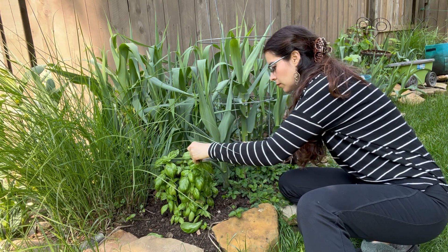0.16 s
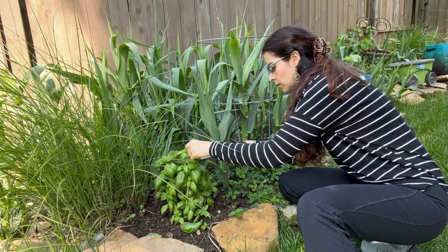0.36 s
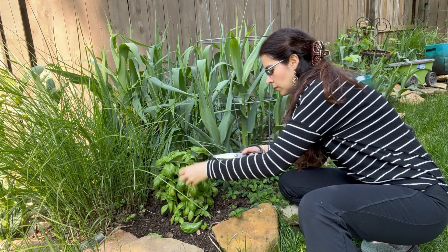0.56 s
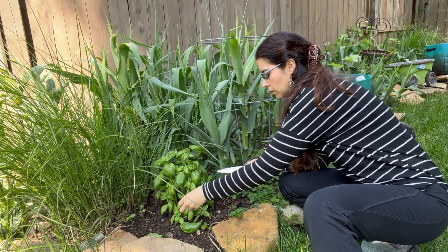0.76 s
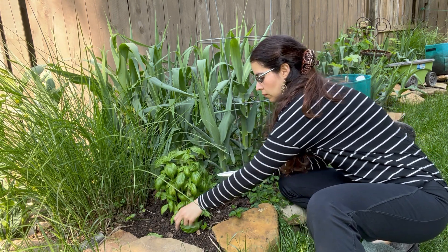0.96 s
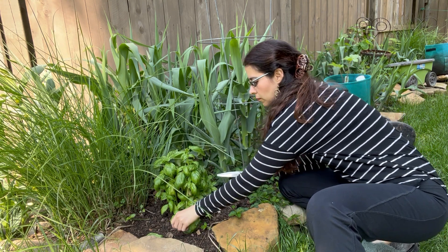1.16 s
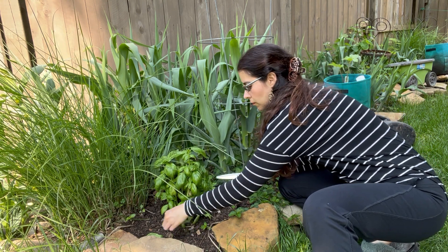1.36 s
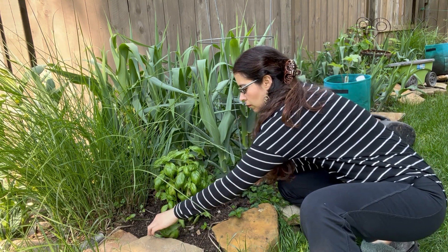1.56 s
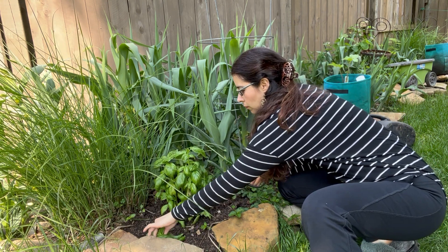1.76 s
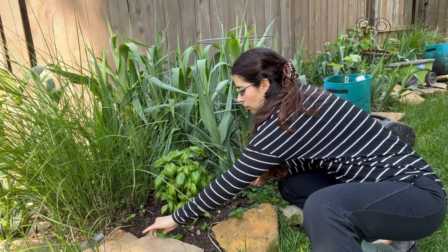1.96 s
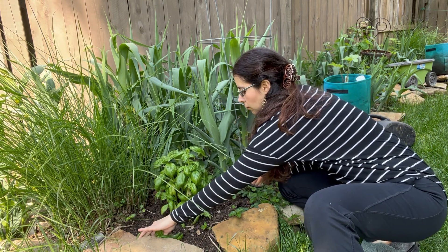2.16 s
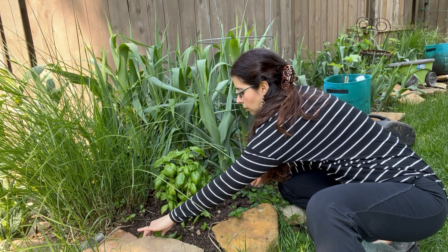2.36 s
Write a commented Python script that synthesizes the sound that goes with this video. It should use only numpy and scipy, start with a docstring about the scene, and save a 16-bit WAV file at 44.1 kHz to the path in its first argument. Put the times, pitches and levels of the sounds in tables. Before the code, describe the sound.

Clear descending bird whistles echo outdoors, with a stem snip, leafy ticks and gritty soil scrapes

```python
"""A songbird's falling whistles echo between garden fences, over a distant engine hum and soft outdoor air.
A second bird chips twice; close by, leaves rustle, a herb stem is snipped and a hand scrapes over the soil.
The birds are swept sines, single and in partials, with scattered echoes; the engine is low sines over filtered noise.
The stem, twigs and clods are decaying noise bursts, the snip adding impulses; leaves and soil are dense random grains.
"""
import sys
import numpy as np
from scipy import signal
from scipy.fft import rfft, irfft
from scipy.io import wavfile
from scipy.ndimage import uniform_filter1d

SR = 44100
rng = np.random.default_rng(int(sys.argv[2]) if len(sys.argv) > 2 else 0)


def store_pcm(level_fs):
    """Save levels as 16-bit WAV."""
    pcm = np.round(np.clip(level_fs, -1, 1) * 32767).astype(np.int16)
    wavfile.write(sys.argv[1], SR, np.atleast_2d(pcm).T)


N = 110250


def undb(db):
    """Decibel law: twenty dB is a factor of ten in amplitude."""
    return 10 ** (np.asarray(db) / 20)


def unit(x):
    """Normalisation: scale to an rms of 1."""
    return x / np.sqrt(np.mean(x ** 2))


def walk(rate):
    """Low-passed randomness: `rate` random values a second, smoothed into a drift with a spread of 1."""
    hold = max(2, int(SR / rate))
    steps = np.repeat(rng.standard_normal(N // hold + 1), hold)
    smooth = uniform_filter1d(uniform_filter1d(steps, hold), hold)
    return unit(smooth[:N])


def colour(x, points):
    """Minimum-phase filtering: a causal response through (Hz, dB) points keeps the power of white noise."""
    hz, db = np.array(points).T
    bins_hz = np.maximum(np.fft.rfftfreq(2 * N, 1 / SR), 1)
    gain = unit(undb(np.interp(np.log(bins_hz), np.log(hz), db)))
    # folding the cepstrum onto positive times makes the filter causal
    cepstrum = irfft(np.log(gain))
    cepstrum[1:N] *= 2
    cepstrum[N + 1:] = 0
    return irfft(rfft(x, 2 * N) * np.exp(rfft(cepstrum)))[..., :N]


def delay(x, seconds):
    """Linear phase shift: delays by any fraction of a sample."""
    turn = np.exp(-2j * np.pi * np.fft.rfftfreq(2 * N, 1 / SR) * seconds)
    return irfft(rfft(x, 2 * N) * turn)[:N]


def ports(x, lag_ms):
    """Arrival-time difference: the right microphone lags the left, or leads it for a negative lag."""
    lag = lag_ms / 1000
    return np.array([delay(x, -lag / 2), delay(x, lag / 2)])


def scatter(x, t60):
    """Diffuse reflection: plants and fences return decaying noise-like echoes, independent in each ear."""
    t = np.arange(N) / SR
    decay = np.exp(-np.log(1000) * t / t60)  # 60 dB down after t60 seconds
    tail = unit(rng.standard_normal((2, N)) * decay) / np.sqrt(N)
    return signal.fftconvolve(x[None], tail, axes=1)[:, :N]


LEAF_SWAY_PER_S = 130


def swaying(x, t60):
    """Modulated scattering: echoes off moving leaves flutter, smearing a pure tone into a narrow band."""
    out = 0
    for _ in range(4):
        flutter = np.array([walk(LEAF_SWAY_PER_S), walk(LEAF_SWAY_PER_S)])
        out = out + scatter(x, t60) * flutter
    return out / 2  # four independent paths, power kept


def gate(u, length, attack, release):
    """Amplitude envelope: linear attack, hold, then exponential release after `length`."""
    return np.clip(u / attack, 0, 1) * np.exp(-np.maximum(u - length, 0) / release)


def cracks(rows, decay):
    """Impulsive fracture: each (s, dB) row starts a very short, exponentially decaying noise burst."""
    t = np.arange(N) / SR
    envelope = sum(undb(db) * (t >= s) * np.exp(-abs(t - s) / decay) for s, db in rows)
    return rng.standard_normal(N) * envelope


# Shape of one whistle. Each row: time from its start in seconds, pitch in Hz, relative level in dB.
WHISTLE = [(0, 4083, -7.5), (.008, 3860, -1.5), (.028, 3530, -2), (.05, 3272, -4), (.092, 2950, -3),
           (.099, 2372, -6), (.118, 2133, -10.5), (.19, 1988, -12), (.235, 1850, -12), (.275, 1718, -6.5),
           (.31, 1652, -14)]
# The whistles. Each row: start in seconds, length in seconds, level in dB ahead of the path gains below.
WHISTLES = [(-.1, .32, -58.5), (0.363, 0.27, -58.5), (0.82, .215, -58.5)]
WHISTLE_WAVER, WAVER_PER_S = .006, 380  # rms share of the pitch, random values per second
PIP_S, PIP_LENGTH_S, PIP_HZ, PIP_DB = .796, .005, 3570, -62
# gains of the direct path and of each kind of echo
BIRD_DIRECT_DB, FENCE_DB, FOLIAGE_DB, BIRD_WET_DB = -11, -14, 0, 1.5
FENCE_S, FOLIAGE_T60_S, BIRD_T60_S = .095, .25, 0.81
BIRD_LAG_MS = -0.348  # the right microphone leads


def songbird():
    """Frequency glide: pure whistles fall with a quick drop midway, then echo; a tiny pip leads the last."""
    lead = .15  # seconds computed ahead, so that a whistle can already be under way at the opening
    t, song = np.arange(N) / SR - lead, 0
    at, hz, shape_db = np.array(WHISTLE).T
    for start, length, db in WHISTLES:
        u = t - start
        pitch = np.interp(u, at, hz) * (1 + WHISTLE_WAVER * walk(WAVER_PER_S))
        tone = unit(np.sin(2 * np.pi * np.cumsum(pitch) / SR))
        level = undb(db + np.interp(u, at, shape_db))
        song = song + level * gate(u, length, 0.00067, .006) * tone
    pip_shape = np.exp(-((t - PIP_S) / PIP_LENGTH_S) ** 2)
    pip = undb(PIP_DB) * pip_shape * np.sin(2 * np.pi * PIP_HZ * t)
    fence = undb(FENCE_DB) * delay(song, FENCE_S)
    foliage = undb(FOLIAGE_DB) * swaying(song, FOLIAGE_T60_S)
    garden = undb(BIRD_WET_DB) * swaying(song, BIRD_T60_S)
    direct = ports(undb(BIRD_DIRECT_DB) * song + pip, BIRD_LAG_MS)
    out = direct + fence + foliage + garden
    skip = int(lead * SR)
    return np.pad(out[:, skip:], ((0, 0), (0, skip)))


# Engine hum. Each row: time in seconds, level of the low line in dB, level of the high line in dB;
# both levels waver about these values.
HUM = [(0, -62.5, -54), (.2, -55.5, -70.5), (.45, -78, -56.5), (0.621, -51, -66), (.76, -69.5, -69.5),
       (.89, -51, -67), (1.02, -69, -77), (1.13, -51.5, -55.5), (1.401, -52.5, -54.5), (1.598, -54, -54),
       (1.78, -51, -50.5), (1.92, -52.5, -56.5), (2.03, -54, -62.5), (2.33, -53.5, -56), (2.5, -80, -65)]
# Spectrum of the rumble. Each row: frequency in Hz, relative density in dB per Hz.
RUMBLE = [(20, -39), (34, -1), (47, 6.5), (62, 7.5), (85, -2), (130, -3.5), (180, -15), (260, -23),
          (500, -65)]
HUM_HZ, HUM_WAVER = 38.83, .012  # base frequency, rms share of it
HUM_OVERTONE_DB, RUMBLE_DB = -70.5, -52


def engine():
    """Harmonic orders: multiples 2, 3 and 4 of one wavering base hum far off over an uneven rumble."""
    t = np.arange(N) / SR
    at, low_db, high_db = np.array(HUM).T
    phase = 2 * np.pi * np.cumsum(HUM_HZ * (1 + HUM_WAVER * walk(8.86))) / SR
    levels = [np.interp(t, at, low_db), np.interp(t, at, high_db), HUM_OVERTONE_DB]
    hum = 0
    for order, db in enumerate(levels, 2):
        line = unit(np.sin(order * phase + 2 * np.pi * rng.random()))
        hum = hum + undb(db + 2.48 * walk(14)) * line
    rumble = undb(RUMBLE_DB) * unit(colour(rng.standard_normal(N), RUMBLE))
    pan_db = 2.0  # left over right
    return ports(hum + rumble, lag_ms=0.415) * undb(np.array([[pan_db], [-pan_db]]) / 2)


# Spectrum of the air. Each row: frequency in Hz, relative density in dB per Hz.
AIR = [(60, 10.5), (200, 2), (450, 3), (900, 0), (1500, -7), (2500, -9), (4000, -24.5), (7000, -28),
       (10000, -39), (16000, -88)]
AIR_DB = -60.5  # mean level, with a slight drift


def air():
    """Incoherent noise field: a soft outdoor wash, independent left and right but for a shared level drift."""
    return undb(AIR_DB + 0.5 * walk(7.5)) * colour(rng.standard_normal((2, N)), AIR)


# Chips of the second bird. Each row: start in seconds, length in seconds, level in dB ahead of the partial gains.
CHIPS = [(.003, 0.0464, -67.5), (0.072, 0.0373, -68)]
# Partials of a chip. Each row: multiple of the base frequency, gain in dB.
CHIP_PARTIALS = [(2, -12), (3, -2.5), (4, -5), (6, -20), (8, -15.5)]
# base frequency at the start and end of a chip (itself not sounded), rms waver as a share
CHIP_FROM_HZ, CHIP_TO_HZ, CHIP_WAVER = 1645, 1535, .014
CHIP_ECHO_DB, CHIP_T60_S = -6, .4


def chips():
    """Harmonic series: two thin, slightly falling notes sum sine partials of one base frequency."""
    t, out = np.arange(N) / SR, 0
    for start, length, db in CHIPS:
        glide = np.interp(t - start, [0, length], [CHIP_FROM_HZ, CHIP_TO_HZ])
        phase = 2 * np.pi * np.cumsum(glide * (1 + CHIP_WAVER * walk(300))) / SR
        note = sum(undb(gain) * np.sin(k * phase) for k, gain in CHIP_PARTIALS)
        out = out + undb(db) * gate(t - start, length, 0.017, 0.002) * note
    near = undb(-2.5) * swaying(out, t60=0.099)
    far = undb(CHIP_ECHO_DB) * swaying(out, CHIP_T60_S)
    return ports(out, BIRD_LAG_MS) + near + far


# Edges between the bands that swell separately within a stroke, each a frequency in Hz.
CLUMP_BANDS = [1200, 2300, 4000, 6500, 10000]
CLUMP_DB, CLUMP_PER_S = 2.7, 90  # rms swell, random values per second


def clumps(x):
    """Band-wise modulation: each band swells by itself as different leaves and crumbs make contact."""
    lows = []
    for hz in CLUMP_BANDS:
        lowpass = signal.butter(3, hz, fs=SR, output="sos")
        lows.append(signal.sosfiltfilt(lowpass, x))
    out, below = 0, 0
    for low in lows + [x]:
        out = out + (low - below) * undb(CLUMP_DB * walk(CLUMP_PER_S))
        below = low
    return out


GRAINS_PER_S, GRAIN_SPREAD_DB = 3400, 2.8


def grains(rate, spread_db):
    """Random contact train: dense tiny impulses of uneven size, in clumps."""
    sizes = undb(spread_db * np.minimum(rng.exponential(size=N), 4))
    contacts = (rng.random(N) < rate / SR) * rng.standard_normal(N) * sizes
    return unit(clumps(contacts))


SWELL_SHARE = 0.43  # of a stroke's length


def stroke(start, length, db, release):
    """Gesture envelope: one movement of the hand, the longer ones swelling more slowly."""
    return undb(db) * gate(np.arange(N) / SR - start, length, SWELL_SHARE * length, release)


# Single leaf and twig ticks. Each row: start in seconds, level in dB.
TICKS = [(.167, -59), (.333, -65), (.5393, -44.5), (.5455, -55), (.688, -64), (.797, -68), (.845, -60.5),
         (1.142, -62.5), (1.252, -59), (1.311, -60), (1.316, -58), (1.443, -66.5), (1.502, -58),
         (1.51, -55.5), (1.516, -54), (1.7062, -56), (1.7247, -52), (1.7786, -54), (1.7865, -50),
         (1.8374, -37), (1.869, -60), (1.8883, -46.5), (1.902, -47.5), (1.9342, -52.5), (1.9415, -53),
         (2.012, -51), (2.119, -59), (2.2007, -59), (2.2147, -54.5), (2.2301, -51), (2.26, -60),
         (2.288, -55.5), (2.3229, -52.5), (2.332, -50.5), (2.3594, -60), (2.3933, -56.5), (2.4112, -59),
         (2.4706, -70)]
# Leaves brushed. Each row: start in seconds, length in seconds, level in dB.
RUSTLES = [(0.223, 0.022, -54), (0.253, 0.037, -56.5), (0.277, 0.19, -69), (0.525, 0.024, -60.5),
           (0.6, 0.096, -76.5), (0.767, 0.087, -76), (1.234, 0.1, -74), (1.425, .1, -73),
           (1.678, 0.078, -61.5), (1.769, 0.027, -51), (1.804, 0.032, -58), (1.823, 0.117, -67),
           (1.971, 0.073, -64), (2.055, 0.034, -58), (2.093, 0.035, -69.5), (2.196, 0.059, -63),
           (2.278, 0.068, -69), (2.358, 0.12, -71)]
# Spectrum of leaves and twigs. Each row: frequency in Hz, relative density in dB per Hz.
LEAF_COLOUR = [(300, -18), (1500, -6), (3000, -3), (4300, -0.5), (5300, -5), (7400, 3), (10500, -12),
               (13000, -6), (16000, -5.5)]
TICK_DECAY_S, LEAF_RELEASE_S = 0.0012, 0.014


def leaves_and_twigs():
    """Friction and impact: brushed leaves are strokes of grains and ticks are bursts, under one spectrum."""
    strokes = sum(stroke(*row, LEAF_RELEASE_S) for row in RUSTLES)
    rustle = grains(GRAINS_PER_S, GRAIN_SPREAD_DB) * strokes
    return colour(rustle + cracks(TICKS, TICK_DECAY_S), LEAF_COLOUR)


# Fibres breaking in the snip. Each row: time in seconds, relative level in dB.
SNIP = [(.2394, -18), (.24495, -1), (.2457, 0), (.24722, -6), (.249, -15)]
# Spectrum of the snip. Each row: frequency in Hz, relative density in dB per Hz.
SNIP_COLOUR = [(200, -14), (1300, -19.5), (1750, -5), (2600, -13), (3800, -16), (5400, -5), (6650, -4),
               (8200, 1), (9700, -11), (11200, -12.5), (13000, -13), (16000, -23.5)]
SNIP_DB, SNIP_DECAY_S, SNIP_LAG_MS = -15, 0.0018, 0.048
SNIP_TEAR_DB, SNIP_NEAR_DB, SNIP_TAIL_DB = -16, -10, -33  # relative to the breaks and cracks


def snip():
    """Brittle fracture: a stem's fibres crack as impulses, each with a short tearing; plants scatter them."""
    at, db = np.array(SNIP).T
    breaks = np.bincount(np.round(at * SR).astype(int), undb(db), N)
    tearing = undb(SNIP_TEAR_DB) * cracks(SNIP, SNIP_DECAY_S)
    crack = colour(breaks + tearing, SNIP_COLOUR)
    near = undb(SNIP_NEAR_DB) * scatter(crack, t60=0.013)
    tail = undb(SNIP_TAIL_DB) * scatter(crack, t60=0.51)
    return undb(SNIP_DB) * (ports(crack, SNIP_LAG_MS) + near + tail)


# Hand and grit on the soil. Each row: start in seconds, length in seconds, level in dB, crunch centre in Hz.
SCRAPES = [(1.496, .015, -65.5, 1870), (1.633, 0.09, -62.5, 1190), (1.694, 0.051, -59, 1750),
           (1.77, 0.029, -59, 3020), (1.803, 0.034, -62.5, 1880), (1.83, .14, -71, 2040),
           (1.977, 0.065, -68, 2340), (2.06, 0.024, -54, 2760), (2.077, 0.048, -66.5, 1670),
           (2.18, .28, -72.5, 2030), (2.282, 0.045, -70, 3970), (2.389, .065, -68.5, 4200)]
# Spectrum of the soil. Each row: frequency in Hz, relative density in dB per Hz.
SOIL_COLOUR = [(150, -16), (400, 3.5), (1000, -5.5), (1800, -2), (3500, -5.5), (5000, -7.5), (8000, -13),
               (16000, -32)]
SOIL_RELEASE_S, CRUNCH_DB, CRUNCH_Q = 0.02, 7, 2.2


def soil():
    """Granular friction with resonance: crumbs grind under the fingers, each scrape around its own pitch."""
    grit, out = colour(grains(GRAINS_PER_S, GRAIN_SPREAD_DB), SOIL_COLOUR), 0
    for start, length, db, hz in SCRAPES:
        crunch = signal.lfilter(*signal.iirpeak(hz, CRUNCH_Q, SR), grit)
        texture = unit(grit + undb(CRUNCH_DB) * crunch)
        out = out + texture * stroke(start, length, db, SOIL_RELEASE_S)
    return out


# Clods cracking. Each row: start in seconds, level in dB ahead of the resonance, ring in Hz.
CLODS = [(1.509, -42, 1900), (1.635, -44, 1550), (1.725, -36.5, 1680), (1.758, -40.5, 1920),
         (1.787, -36.5, 2940), (2.0668, -47, 2300), (2.0773, -36.5, 1770), (2.0805, -37, 3100),
         (2.091, -39, 2100)]
CLOD_Q, CLOD_DECAY_S = 3.4, 0.004


def clods():
    """Damped resonance: small clods crack under the fingers, each burst exciting a short dull ring."""
    out = 0
    for start, db, hz in CLODS:
        burst = cracks([(start, db)], CLOD_DECAY_S)
        out = out + signal.lfilter(*signal.iirpeak(hz, CLOD_Q, SR), burst)
    return out


HAND_LAG_MS, NEAR_WET_DB, NEAR_T60_S = 0.042, -11, 0.084


def gardening():
    """Direct and scattered sound: leaves, twigs and soil close to the microphones, with short reflections."""
    hand = leaves_and_twigs() + soil() + clods()
    early = undb(-11.0) * scatter(hand, t60=0.019)
    late = undb(NEAR_WET_DB) * scatter(hand, NEAR_T60_S)
    return ports(hand, HAND_LAG_MS) + early + late


def scene():
    """Superposition: the pressures of all sources add."""
    return songbird() + engine() + air() + chips() + gardening() + snip()


TOP_HZ = 15900


def record(dry):
    """Band limiting: the recorder cuts the top with a steep elliptic low-pass."""
    return signal.sosfilt(signal.ellip(8, .2, 70, TOP_HZ, fs=SR, output="sos"), dry)


dry = scene()
out = record(dry)
store_pcm(out)
```